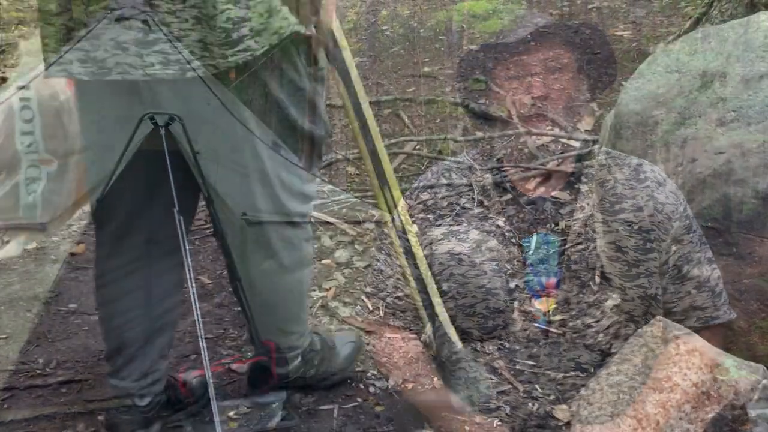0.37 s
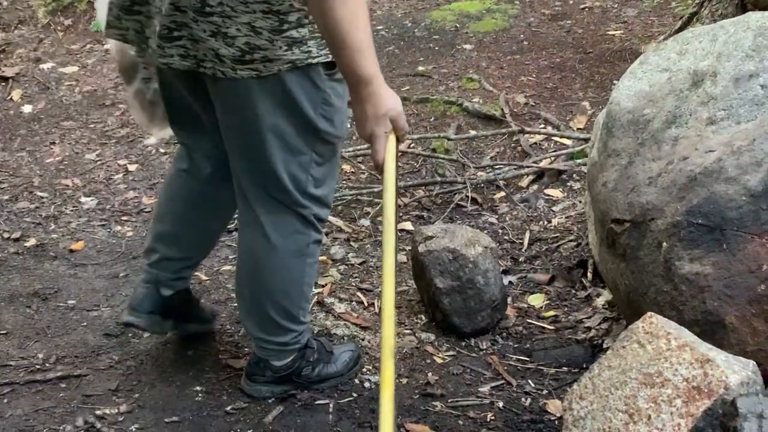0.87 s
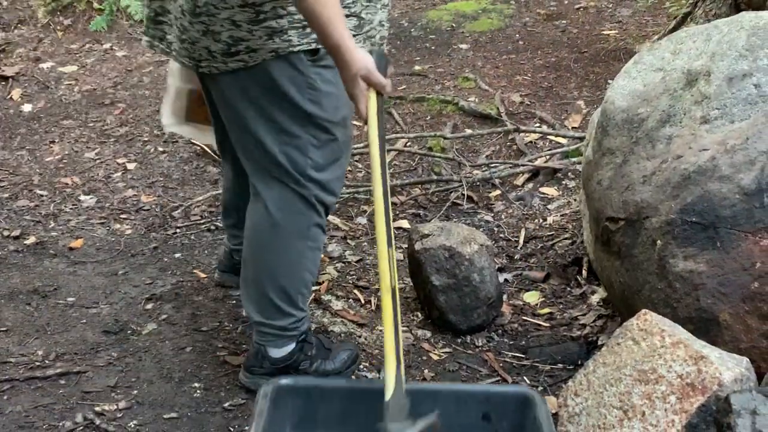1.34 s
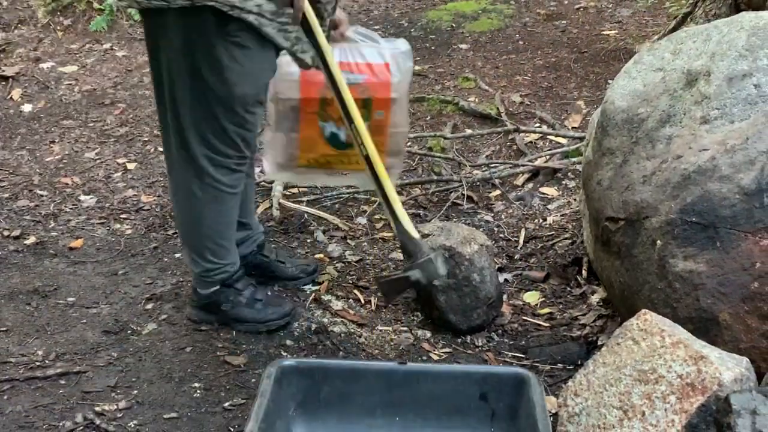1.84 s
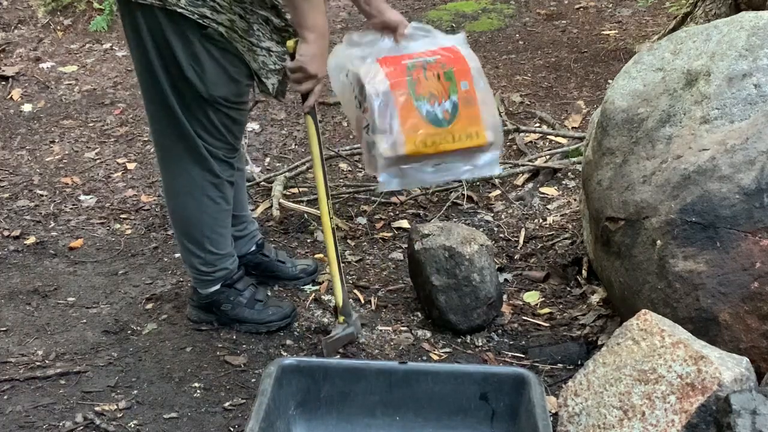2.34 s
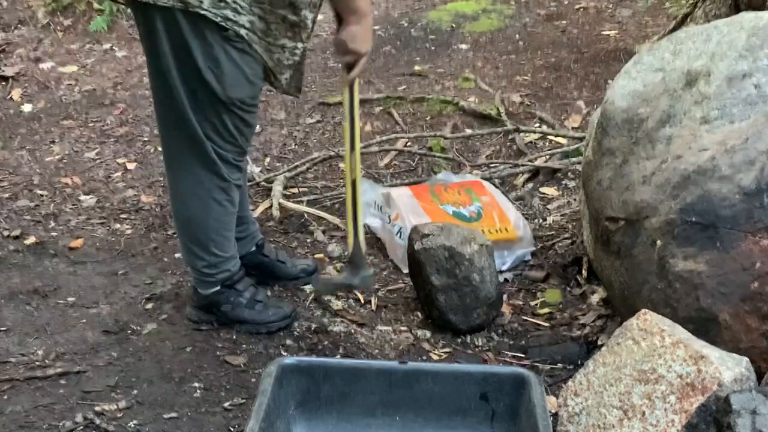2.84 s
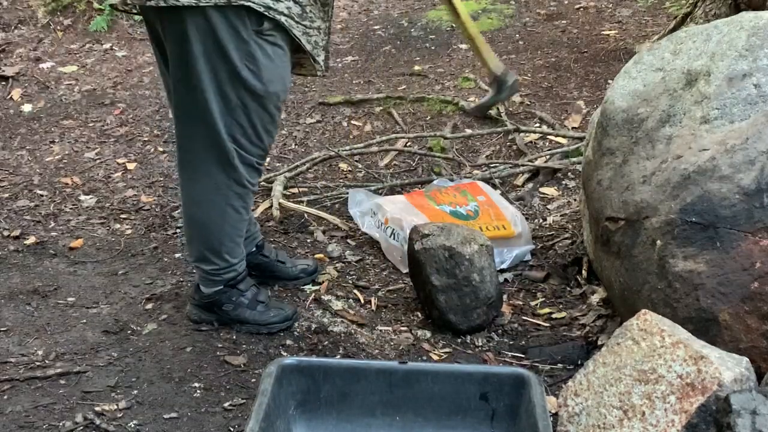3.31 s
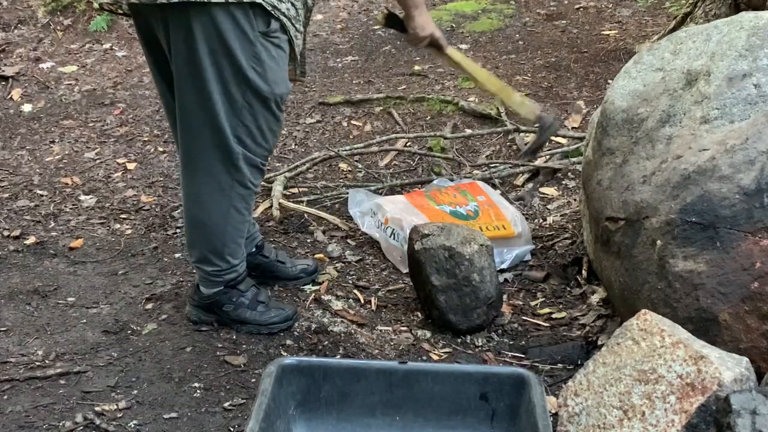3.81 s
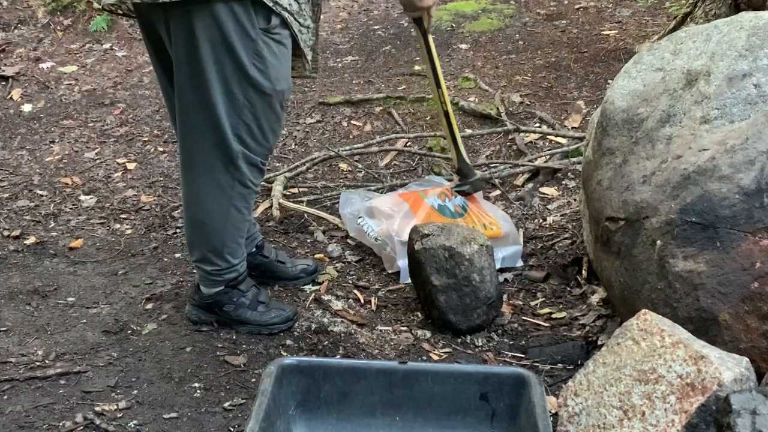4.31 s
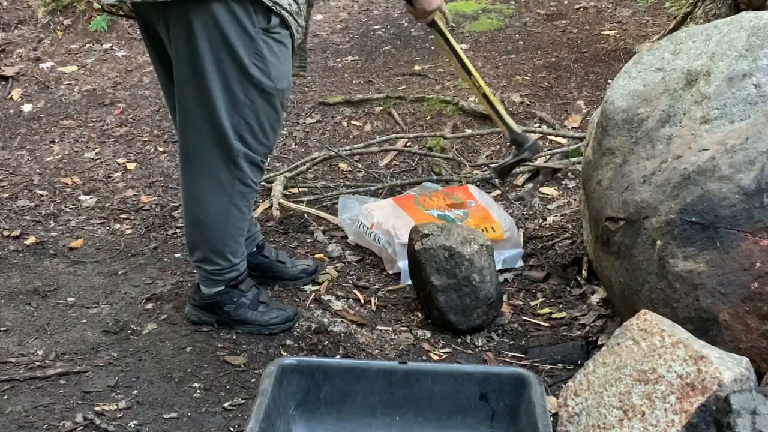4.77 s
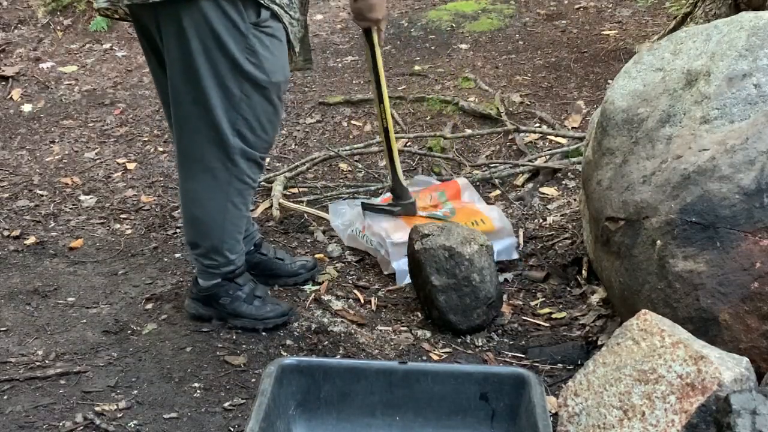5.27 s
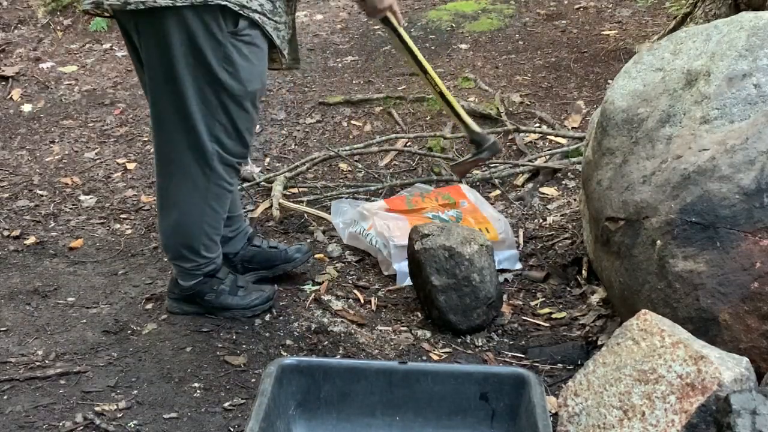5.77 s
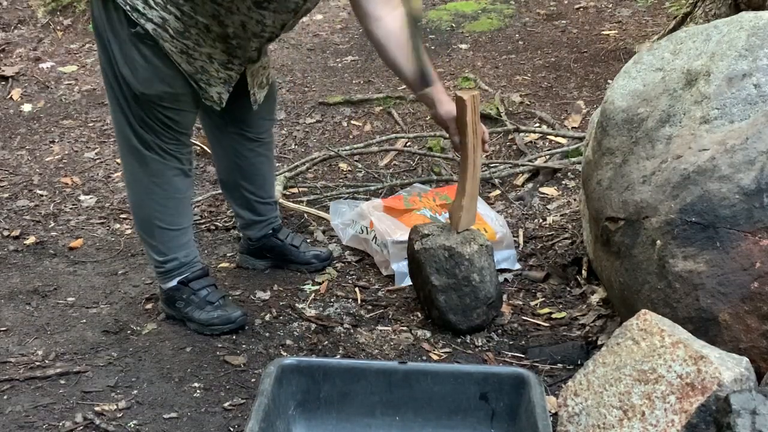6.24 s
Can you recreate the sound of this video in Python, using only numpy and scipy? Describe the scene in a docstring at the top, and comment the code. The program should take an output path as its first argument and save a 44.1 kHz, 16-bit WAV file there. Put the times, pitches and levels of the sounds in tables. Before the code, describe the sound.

At a quiet forest camp, an axe head bangs and scrapes in a plastic tub, a bag of firewood thumps down, then two crinkling axe blows.

```python
"""Axe, tub and firewood bag

At a forest camp an axe head knocks and scrapes in a plastic tub, then a plastic bag of firewood drops on
the ground and the axe strikes it twice. Knocks are rough contacts that make a body ring; thuds are sagging
low swings; rubbing and crinkling are shaped noise; jingles are ringing metal. Hiss and a low rumble lie
behind, and near the end the scene cuts to a louder rumble. Two close microphone ports hear it all."""
import sys
import numpy as np
from scipy import signal
from scipy.fft import rfft, irfft
from scipy.io import wavfile

SR = 44100
rng = np.random.default_rng(int(sys.argv[2]) if len(sys.argv) > 2 else 0)


def store_wav(level_fs):
    """Save 16-bit WAV to argv[1]."""
    pcm = np.round(np.clip(np.atleast_2d(level_fs), -1, 1) * 32767)
    wavfile.write(sys.argv[1], SR, pcm.T.astype(np.int16))


def how_loud(loudness_db):
    """Turn decibels into a plain amplitude multiplier (0 dB gives 1, 20 dB gives 10)."""
    steps = np.asarray(loudness_db, float) / 20
    return 10 ** steps


N = 281358
T = np.arange(N) / SR  # time of every sample [s]
CUT_S, RESUME_S = 5.953, 5.966  # the first background stops, the late one starts

# forest air and far rumble: (pitch [Hz], gain [dB])
AIR = [(40, -18.5), (98, -12), (176, -23), (430, -23), (1000, -28.5), (2500, -32), (5000, -39),
       (7500, -53.5), (11000, -50), (16000, -42)]
# how the air changes: (time [s], level of its middle pitches [dB], gain of the rumble [dB])
AIR_LEVEL = [(0, -56, -43), (.9, -58.5, 5), (1.999, -58.5, 7.5), (3.302, -58.5, 2), (3.902, -60, 10),
             (5.001, -57.5, 8.5), (5.95, -58.5, 3)]
# background after the cut: (pitch [Hz], gain [dB])
LATE_AIR = [(35, -5), (70, 5), (240, -10), (330, -18), (520, -16.5), (680, -25), (2000, -29.5), (7000, -47),
            (16000, -61)]
# movements that rub and crinkle: (time of full effort [s], hold [s], effort [dB], film over effort [dB],
# fade [dB per s], brightness of the grit [dB per octave])
MOVES = [(0.911, 0.068, -31.5, -10.5, 250, -0.5), (1.027, 0.15, -27, -10, 122, -0.8),
         (1.272, 0.094, -33.5, -17, 109, -1), (1.405, 0.16, -32, -8, 360, -1.4),
         (1.622, 0.091, -49.5, -32, 198, -3.4), (1.782, 0.073, -48, -10.5, 299, -2),
         (2.06, 0.0048, -46.5, -31.5, 300, -1), (2.231, 0.019, -55.5, 2, 199, 1),
         (2.353, 0.065, -54, 2.5, 93, 2.9), (2.44, 0.049, -39, 3, 191, 0.6),
         (2.588, 0.064, -41.5, -16, 247, 0), (2.706, 0.034, -12, -9, 595.5, 1),
         (2.778, .05, -30, -10.5, 67.5, 2), (3.067, 0.021, -35, -14.5, 318, -3),
         (3.284, 0.0215, -50.5, 3, 305, 2.5), (3.962, 0.008, -22.5, -6, 246, 1.5),
         (3.972, 0.007, -14.5, 0.5, 255, -0.2), (4.021, 0.025, -27.5, 0, 129, 2.5),
         (4.167, 0.0497, -43.5, -4.5, 97, 1), (4.226, 0.07, -33.5, -8, 204, 0.5),
         (4.353, 0.2, -42, 1, 92, 2.5), (4.496, 0.07, -36.5, -1.5, 252, 0.5),
         (4.598, 0.023, -42, 0.5, 123, -0.3), (4.648, 0.059, -39.5, 6.5, 335, 3),
         (5.219, 0.015, -20.5, 3.8, 449, 1.5), (5.279, 0.072, -28.5, 0, 297, -2.4),
         (5.379, 0.03, -44, -7.5, 114, 4.5), (5.446, 0.065, -32.5, -8, 328, -0.6)]
# scraping grit: (pitch [Hz], gain [dB])
SCRAPE = [(150, -12), (260, 0), (500, -1), (1100, -4), (2100, -10), (3100, -16.5), (6000, -27)]
# crinkling plastic film: (pitch [Hz], gain [dB])
FILM = [(1500, -10), (3000, -9.5), (5500, -10.5), (7000, -10), (9500, -7), (12000, -14.5), (16000, -13.5)]
# dull drag of the load: (pitch [Hz], gain [dB])
DRAG = [(35, -19.5), (60, 6.5), (110, -3.5), (170, -4), (300, -29.5)]
# single snaps of the film: (time [s], level [dB])
SNAPS = [(1.0188, -21), (1.3218, -15.5), (1.4276, -18.5), (1.5344, -18), (1.03, -25.5), (2.2118, -36.5),
         (2.4348, -18.5), (2.6428, -29), (3.2784, -32), (3.3105, -32), (4.132, -28), (4.1829, -26),
         (4.2769, -27), (4.3732, -36), (4.5527, -27), (4.703, -26.5), (5.222, -16), (5.239, -16),
         (5.312, -23.5), (5.474, -28.5)]
# small metal parts touching: (time [s], level [dB], chatter [ms], ring over chatter [dB])
JINGLES = [(0.087, -46.5, 150, -17), (0.187, -39.5, 51, -20), (0.305, -42, 28, -10), (0.51, -37.5, 27, -22),
           (.657, -42.5, 17, -2.5), (1.767, -31.5, 9, 1.5), (1.96, -37, 24, 16), (2.019, -35.5, 14, 4),
           (2.282, -38, 7.1, 1), (5.663, -40, 14.6, 16.5), (5.715, -37, 6.5, 4)]
# ringing of the small metal parts: (pitch [Hz], level [dB], time to fall 60 dB [s])
METAL = [(15600, 3.5, 0.076), (15480, -5, .08), (12850, -5, .1), (12550, -9, .05), (9300, -15, 0.05)]
# weight landing on soft ground: (time [s], level [dB], pitch it settles to [Hz], time to fall 60 dB [s])
THUDS = [(0.926, -8.5, 70, 0.073), (2.079, -30.5, 116, 0.12), (2.237, -29.5, 88, 0.27),
         (2.729, -5, 61.9, 0.33), (3.075, -19.5, 123.8, 0.094), (3.974, -11, 93.5, 0.091),
         (5.288, -27, 123.7, 0.19), (5.49, -27.5, 105.4, 0.28)]
# logs knocking in the bag and on the soil:
# (time [s], level [dB], loudest pitch of that log [Hz], contact [ms])
LOG_KNOCKS = [(2.055, -34, 800, 6), (2.681, -25.5, 1300, 5), (2.693, -7, 1450, 9), (2.709, 5.5, 1380, 10),
              (2.712, 0.5, 773, 12), (2.7155, 3, 347, 2.1), (2.723, 1.5, 1515, 15.5),
              (2.732, -3.5, 1000, 5.2), (2.741, -6.5, 200, 13), (2.864, -15.5, 311.6, 2.5),
              (2.894, -26.5, 445, 2.5), (2.941, -21, 338, 8.7), (2.972, -23.5, 470, 4.7),
              (3.067, -10.5, 810, 7.1), (3.961, -14.5, 278, 8), (3.976, 2.5, 550, 11),
              (3.987, -5, 1510, 11.4), (4.006, -7.5, 266, 14), (4.245, -20.5, 430, 4),
              (4.375, -32, 1220, 12), (4.51, -23.5, 1230, 18), (4.546, -22, 467, 1.7),
              (4.583, -20, 270, 3.5), (5.214, -21, 432, 6), (5.221, -7.5, 1064, 6), (5.223, -9.5, 302, 5.4),
              (5.24, -14.5, 246, 2.3), (5.286, -14.5, 1440, 8.2), (5.291, -5.5, 228, 7.8),
              (5.319, -8, 398, 5.7), (5.363, -31, 905, 6), (5.453, -21.5, 475, 6.5)]
# ringing of the logs: (pitch [Hz], width [Hz], level [dB])
LOGS = [(174.8, 40, -27.5), (285, 97, 5.5), (470, 640, 5.5), (775, 93, -4), (1220, 290, 5), (1556, 270, 0),
        (2130, 1300, -8)]
# axe head on the tub wall: (time [s], level [dB], loudest pitch of that spot [Hz])
TUB_KNOCKS = [(0.458, -30.5, 340), (0.898, -3, 520), (0.905, 8.5, 374), (0.931, -18.5, 303),
              (0.962, -19, 610), (1.01, -16, 420), (1.021, -21, 317), (1.049, -18.5, 470), (1.073, -7, 346),
              (1.094, -11, 367.5), (1.136, -15, 1110), (1.151, -16.5, 926), (1.18, -19.5, 930),
              (1.191, -18, 1000), (1.203, -14.5, 362), (1.21, -13.5, 973), (1.221, -14.5, 457),
              (1.233, -19.5, 390), (1.255, -10.5, 988), (1.797, -32, 430), (1.854, -38, 504),
              (1.944, -39.5, 554)]
# ringing of the tub: (pitch [Hz], width [Hz], level [dB])
TUB = [(211, 38.9, -35.5), (356, 90, -0.5), (558, 120, 0), (1000, 280, -5), (1614, 500, -21)]
# the axe edge biting through the film into wood: (time [s], level [dB])
CRACKS = [(3.9765, -5), (5.2215, -8)]
# ringing of the steel axe head: (pitch [Hz], level [dB], time to fall 60 dB [s])
AXE_HEAD = [(5259, -13, .11), (6815, -3, 0.058), (9500, -11, .047), (14240, -7.5, .052)]
# how far the left port leads the right: (pitch [Hz], lead [cycles])
LEAD = [(0, 0), (2000, 0), (3000, .25), (4000, .15), (5300, .5), (6300, 1), (8200, .52), (8900, .48),
        (10600, .03), (11400, -.03), (13100, -.48), (13800, -.52), (15300, -.97), (16000, -1)]
# left port against right: (pitch [Hz], level [dB])
SHADE = [(2000, 0), (5300, -4.5), (6500, 0)]
# share of the power of near sounds that is alike in both ports: (pitch [Hz], likeness [0 to 1])
SAME = [(300, .995), (800, .88), (2000, .8), (3500, .45), (5500, .35), (6500, .7), (8100, .997),
        (16000, .997)]
# the same for the background: (pitch [Hz], likeness [0 to 1])
SAME_AIR = [(200, .93), (700, .3), (1500, .15), (6000, .2), (7400, .4), (8100, .995), (16000, .995)]
# highest level before peaks are cut flat: (time [s], ceiling [dB])
CEILING = [(0, -4), (.9, -2), (1.2, 0), (6.4, 0)]


def evened(x):
    """Scales a sound to an rms of 1."""
    return x / np.sqrt(np.mean(x ** 2) + 1e-20)


def read(points, hz):
    """Reads a table between its points, on a log pitch axis."""
    f, value = np.transpose(points)
    return np.interp(np.log(hz + 1), np.log(f + 1), value)


def add(mix, s, sound):
    """Mixes a sound in at time s."""
    part = mix[round(s * SR):][:len(sound)]
    part += sound[:len(part)]


def coloured(x, points):
    """Turns each pitch of x up or down by the gains of a table."""
    gain = how_loud(read(points, np.fft.rfftfreq(len(x), 1 / SR)))
    return irfft(rfft(x) * gain, len(x))


def band_pass(x, order, low_hz, high_hz):
    """Keeps the pitches between two limits."""
    return signal.sosfilt(signal.butter(order, [low_hz, high_hz], "band", fs=SR, output="sos"), x)


def air():
    """Filtered noise gives a soft forest hiss and a far rumble; louder and duller after the cut."""
    s, db, rumble_db = np.transpose(AIR_LEVEL)
    full = coloured(rng.standard_normal(N), AIR)
    rumble = signal.sosfilt(signal.butter(2, 200, fs=SR, output="sos"), full)
    middle = band_pass(full, 2, 300, 3000)
    hiss_and_rumble = full - rumble + how_loud(np.interp(T, s, rumble_db)) * rumble
    early = how_loud(np.interp(T, s, db)) * hiss_and_rumble / middle.std()
    late = how_loud(-35) * evened(coloured(rng.standard_normal(N), LATE_AIR))
    return early * (T < CUT_S) + late * (T > RESUME_S)


def crackle(per_s, spread_db, tail_ms, hiss):
    """Random snaps of many sizes, each a dying puff of noise, over a smooth hiss."""
    sizes = how_loud(spread_db * np.minimum(rng.exponential(1, N), 4))
    ticks = (rng.random(N) < per_s / SR) * sizes
    puffs = signal.lfilter([1], [1, -np.exp(-1000 / (tail_ms * SR))], ticks)
    return (evened(puffs) + hiss) * rng.standard_normal(N)


def gravel(count):
    """Grains of many sizes: each band of pitch crackles alone. Gives bands and their octaves over 900 Hz."""
    edges = np.geomspace(120, 7000, count + 1)  # Hz
    grains = []
    for low_hz, high_hz in zip(edges, edges[1:]):
        grain = evened(crackle(per_s=200, spread_db=4.5, tail_ms=2, hiss=0.6))
        grains.append(band_pass(grain, 1, low_hz, high_hz))
    return grains, np.log2(np.sqrt(edges[1:] * edges[:-1]) / 900)


def rustle():
    """Each movement rises, holds and fades; its effort drives scraping grit, film and the load's dull drag."""
    rise_s, drag_lag_s = 0.026, 0.016
    grains, octaves = gravel(count=6)
    film = evened(coloured(crackle(per_s=500, spread_db=4.2, tail_ms=1.6, hiss=0.75), FILM))
    drag = evened(coloured(crackle(per_s=20, spread_db=-4.0, tail_ms=18, hiss=1.3), DRAG))

    t = np.arange(0, N / SR, 0.002)
    s, hold, db, film_db, fade, tilt_db = np.transpose(MOVES)[..., None]
    # efforts over -28 dB rise faster; every rise ends at the time in the table
    rise_time = rise_s * how_loud(-0.6 * np.maximum(db + 28, 0))
    rise = np.clip(1 + (t - s) / rise_time, 0, 1) ** 2
    power = (rise * how_loud(db - abs(fade) * np.maximum(t - s - hold, 0))) ** 2
    effort = np.sqrt(power.sum(0))
    crinkle = np.sqrt((power * how_loud(film_db) ** 2).sum(0))

    # drag is -38 dB at -36.5 dB of effort; above -40 dB it grows only 0.53 dB per dB
    weight = how_loud(-38) * (effort / how_loud(-36.5)) ** np.where(effort > how_loud(-40), 0.53, 1)
    weight = np.minimum(weight, how_loud(-24.5))  # and no further under hard blows

    rubbed = np.zeros(N)
    for grain, octave in zip(grains, octaves):
        strength = np.sqrt((power * how_loud(tilt_db * octave) ** 2).sum(0))
        rubbed += grain * np.interp(T, t, strength)
    grit = coloured(rubbed, SCRAPE) / coloured(sum(grains), SCRAPE).std()
    return grit + np.interp(T, t, crinkle) * film + np.interp(T - drag_lag_s, t, weight) * drag


def chatter(grit, ms, low_hz):
    """A puff of treble noise that rises fast and dies in some ms."""
    t = np.arange(len(grit)) / SR * 1000
    puff = grit * np.exp(-t / max(ms, 0.5)) * (1 - np.exp(-t / 0.4))
    return signal.lfilter(*signal.butter(2, low_hz, "high", fs=SR), puff)


def pops(rows, ms, low_hz, size):
    """One short puff of noise for each row of time and level."""
    out = np.zeros(N)
    for s, db in rows:
        pop = chatter(rng.standard_normal(size), ms, low_hz)
        add(out, s, how_loud(db) * pop / abs(pop).max())
    return out


def snaps():
    """Folds of the film pop over, each a short bright puff."""
    return pops(SNAPS, ms=6.5, low_hz=2595, size=4000)


def dying_modes(modes):
    """Pure tones that each die at their own speed."""
    t = np.arange(6000) / SR
    return sum(how_loud(db - 60 * t / t60) * np.sin(2 * np.pi * hz * t) for hz, db, t60 in modes)


def jingles():
    """Small metal parts: a short bright chatter sets thin high modes ringing."""
    out = np.zeros(N)
    modes = dying_modes(METAL)
    for s, db, ms, ring_db in JINGLES:
        bright = chatter(rng.standard_normal(6000), ms, low_hz=8800)
        rung = signal.fftconvolve(bright, modes)[:6000]
        sound = bright / abs(bright).max() + how_loud(ring_db) * rung / abs(rung).max()
        add(out, s, how_loud(db) * sound)
    return out


def thuds():
    """Soft soil gives a low dying swing whose pitch sags."""
    out, t = np.zeros(N), np.arange(SR // 2) / SR
    for s, db, hz, t60 in THUDS:
        swing = np.sin(2 * np.pi * hz * (t + 0.0033 * (1 - np.exp(-t / 0.01))))
        fall = how_loud(db - 60 * t / max(t60, 0.02))
        add(out, s, fall * swing * (1 - np.exp(-t / 0.0047)))
    return out


def ring(modes, size=3000):
    """Answer of a body to one tick: dying tones, where a wider mode dies faster."""
    t = np.arange(size) / SR
    return sum(how_loud(db) * np.exp(-np.pi * w * t) * np.sin(2 * np.pi * f * t) * w for f, w, db in modes)


def knocks(rows, modes, spot_width, spot_db, crack_hz, tail_db, tail_ms, bright_db, dulling, push,
           rise_ms=1.4):
    """A rough contact drives the body and the struck spot; its bare crack and a settling tail add treble."""
    out, t = np.zeros(N), np.arange(6000) / SR * 1000
    for s, db, hz, ms in rows:
        fall = np.exp(-(t / max(ms, 0.5)) ** 2) + how_loud(tail_db) * np.exp(-t / tail_ms)
        contact = rng.standard_normal(6000) * fall
        contact *= 1 - np.exp(-(t / rise_ms) ** 2)  # the load builds up
        contact[100:125] += push  # and gets one short push

        # keep a broad range around the struck pitch
        soft_band = [0.34 * hz, max(4.1 * hz, 1300)]
        soft = signal.lfilter(*signal.butter(2, soft_band, "band", fs=SR), contact)
        whole = signal.fftconvolve(soft, ring(modes))[:6000]
        spot = signal.fftconvolve(soft, ring([(hz, spot_width, 0)]))[:6000]
        body = whole / abs(whole).max() + how_loud(spot_db) * spot / abs(spot).max()

        crack = signal.lfilter(*signal.butter(1, [1500, crack_hz], "band", fs=SR), contact)
        # the crack's share drops 1 dB per octave of pitch over 500 Hz, and by dulling per dB of blow
        crack_db = bright_db - dulling * db - np.log2(hz / 500)
        sound = body / abs(body).max() + how_loud(crack_db) * crack / abs(crack).max()
        add(out, s, how_loud(db) * sound)
    # too small to push deep bass
    return signal.sosfilt(signal.butter(2, 110, "high", fs=SR, output="sos"), out)


def log_knocks():
    """Logs ring briefly over broad modes; harder blows have a larger share of crack."""
    return knocks(LOG_KNOCKS, LOGS, spot_width=120, spot_db=-0.5, crack_hz=7050, tail_db=-16.5, tail_ms=14,
                  bright_db=-14, dulling=-0.15, push=0.95)


def tub_knocks():
    """The tub wall rings under 5 ms contacts; harder blows have a smaller share of crack."""
    rows = [(*row, 5) for row in TUB_KNOCKS]
    return knocks(rows, TUB, spot_width=48, spot_db=6, crack_hz=5120, tail_db=-12, tail_ms=16,
                  bright_db=-24.5, dulling=0.2, push=0.53)


def cracks():
    """The axe edge bites through film into wood: a very short wide puff."""
    return pops(CRACKS, ms=1.8, low_hz=1100, size=2000)


def axe_ring():
    """The steel axe head touches stone and its thin modes ring and die."""
    out = np.zeros(N)
    add(out, 3.072, how_loud(-33.5) * dying_modes(AXE_HEAD))
    return out


def ports(x, likeness, spread_ms):
    """Each port hears the sound with a phase lead plus its own scatter, which keeps changing."""
    hz, t = np.fft.rfftfreq(N, 1 / SR), np.arange(4000) / SR * 1000
    sides = np.array([[0.5], [-0.5]])  # left, right
    scatter = rng.standard_normal((6, 2, 4000)) * np.exp(-t / spread_ms)
    scatter = rfft(scatter / np.linalg.norm(scatter, axis=2)[..., None], N)
    # six scatters take turns, six rounds a second
    turn = (T * 36 + np.arange(6)[:, None]) % 6
    shares = np.where(turn < 2, np.sin(np.pi * turn / 2), 0)  # squares sum to 1
    scattered = (rfft(x * shares)[:, None] * scatter).sum(0)
    same = read(likeness, hz)
    lead = np.exp(2j * np.pi * np.interp(hz, *np.transpose(LEAD)) * sides)
    heard = np.sqrt(same) * lead * rfft(x) + np.sqrt(1 - same) * scattered
    return irfft(heard * how_loud(read(SHADE, hz) * sides), N)


def scene():
    """Adds the near sounds and the background, each as heard by the two ports."""
    background = ports(air(), SAME_AIR, spread_ms=42)
    background *= (T < CUT_S) | (T > RESUME_S)  # the gap stays silent
    moving = rustle() + snaps() + jingles() + thuds()
    struck = log_knocks() + tub_knocks() + cracks() + axe_ring()
    return background + ports(moving + struck, SAME, spread_ms=4.5)


def band_limit(x):
    """A steep low-pass at the top of the band."""
    return signal.sosfilt(signal.butter(12, 15950, fs=SR, output="sos"), x)


def record(dry):
    """Cuts deep bass, clips the loudest blows flat under a ceiling that rises early on, limits the treble."""
    x = signal.sosfilt(signal.butter(3, 50, "high", fs=SR, output="sos"), dry)
    ceiling = how_loud(np.interp(T, *np.transpose(CEILING)))
    clipped = np.clip(x, -ceiling, ceiling)
    mix = signal.oaconvolve(clipped, signal.firwin(511, 15850, fs=SR)[None], "same")
    return band_limit(mix)


dry = scene()
out = record(dry)
store_wav(out)
```